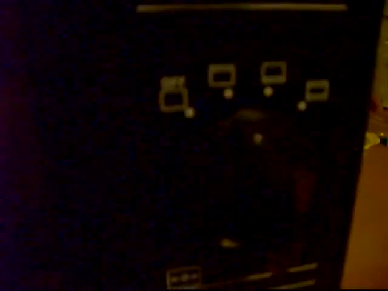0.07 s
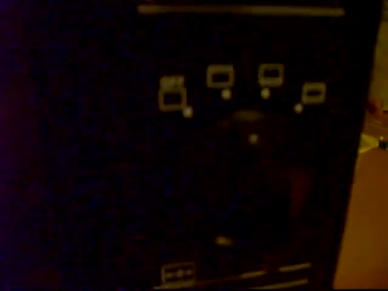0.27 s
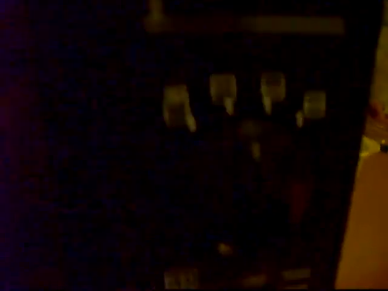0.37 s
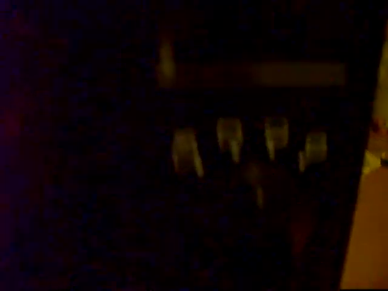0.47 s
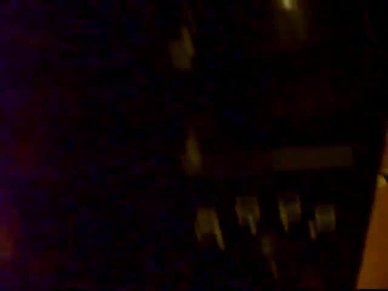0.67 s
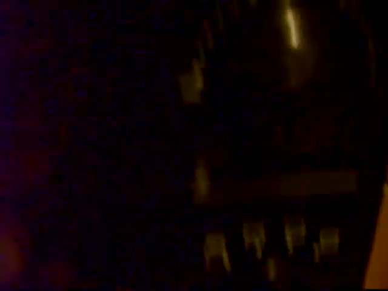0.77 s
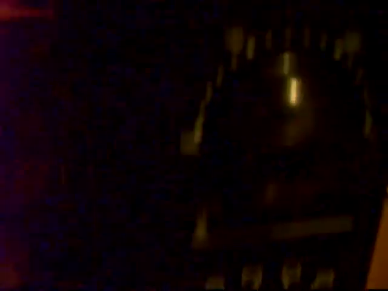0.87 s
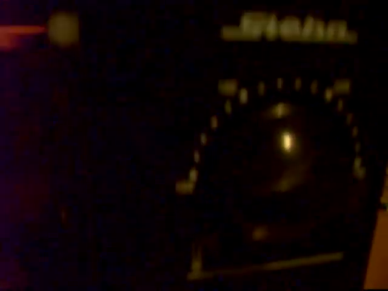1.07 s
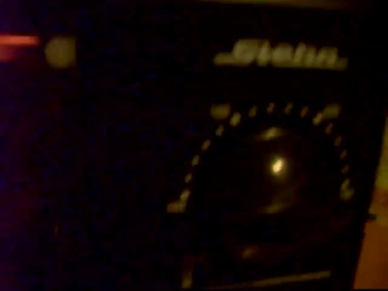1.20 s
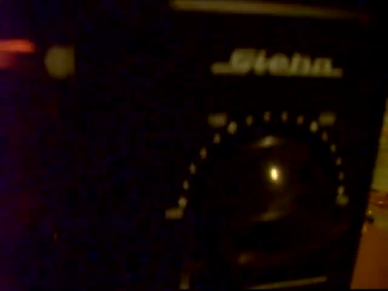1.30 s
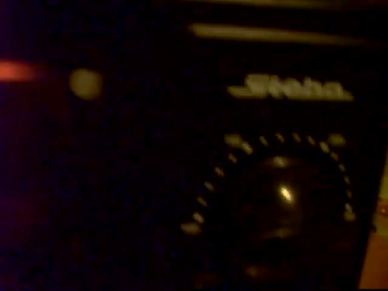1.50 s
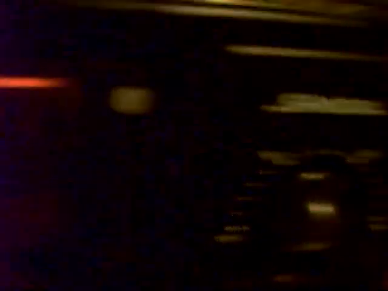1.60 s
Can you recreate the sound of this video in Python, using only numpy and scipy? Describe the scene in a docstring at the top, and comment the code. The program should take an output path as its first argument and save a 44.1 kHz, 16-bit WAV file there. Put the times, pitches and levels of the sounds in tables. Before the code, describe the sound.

A sharp plastic click sounds once, close to the microphone. A clockwork oven timer ticks faintly and evenly throughout, over the oven's low hum and hiss in a small kitchen, with a soft bump near the end.

```python
"""Small kitchen, one microphone. From the start, the oven's hum and airy rush, and hiss with a thin whine.
A clockwork oven timer ticks throughout, each beat a light catch and then a firmer drop.
At 0.2 s, close to the microphone, a plastic part creaks under strain and snaps once.
Around 1 s a brief rustle passes; at 1.3 s something bumps softly on a casing."""
import sys
import numpy as np
from scipy import signal
from scipy.fft import rfft, irfft
from scipy.io import wavfile

SR = 44100
rng = np.random.default_rng(int(sys.argv[2]) if len(sys.argv) > 2 else 0)


def generate_wav(signal):
    """Clip the signal to [-1, 1] and save it as 16-bit WAV at the path in sys.argv[1]."""
    frames = np.transpose(np.atleast_2d(signal))
    scaled = np.clip(frames, -1, 1) * 32767
    pcm = np.round(scaled).astype(np.int16)
    wavfile.write(sys.argv[1], SR, pcm)


N = 72765
TIME = np.arange(N) / SR


# the timer's light catches (time [s], level [dB])
CATCHES = [(0.174, -36), (0.4438, -39), (0.7095, -36.5), (0.976, -39.5), (1.2452, -39.5), (1.5124, -43.5)]
# its firm drops (time [s], level [dB], rebound relative to the drop [dB])
DROPS = [(0.2153, -34, -21), (0.4715, -30, -11), (.7460, -31, -2.5), (1.0070, -35.5, -6),
         (1.2846, -33.5, -10), (1.5433, -38, -2)]
def timer(slips=4, slip_db=-10.5, rebound_s=0.0061):
    """The escapement catches, slides along the tooth in tiny slips, then drops and rebounds."""
    out = np.zeros(N)
    for (catch_s, catch_db), (drop_s, drop_db, rebound_db) in zip(CATCHES, DROPS):
        add(out, catch_s, amp(catch_db) * tick(firm=False))
        for slip_s in rng.uniform(catch_s, drop_s, slips):
            add(out, slip_s, amp(catch_db + slip_db) * tick(firm=False))
        add(out, drop_s, amp(drop_db) * tick(firm=True))
        add(out, drop_s + rebound_s, amp(drop_db + rebound_db) * tick(firm=True))
    return out


# modes of the works (frequency [Hz], level at a catch [dB], level at a drop [dB], t60 [s])
WORKS_MODES = [(2390, -14.5, -12, 0.024), (2693, -7.5, -11, 0.028), (3610, -26, -9.5, 0.039),
               (3840, -25.5, -4, 0.021), (4235, -3.5, -3, 0.023), (4640, -6.5, -7.5, 0.022),
               (5000, -17, -26, 0.018), (6310, -16, -10, 0.021), (7250, -12, -11, 0.016)]
# chatter of the works (frequency [Hz], gain [dB])
CHATTER_SPECTRUM = [(800, -20), (1700, -11), (2500, -2.5), (3100, -13.5), (4000, 0.5), (4700, -1),
                    (5400, -6), (6600, -10.5), (7600, -6.5), (9000, -17)]
def tick(firm, rise_s=0.00013):
    """A small metal impact rings the works, with brief chatter and a faint tail."""
    t = TIME[:8192]
    ring = sum(amp(drop_db if firm else catch_db) * decay(t, t60) * tone(hz, t)
               for hz, catch_db, drop_db, t60 in WORKS_MODES)
    chatter = amp(3.5) * burst(t, t60=0.011)
    tail = amp(-8) * burst(t, t60=0.15)
    return colour(chatter + tail, CHATTER_SPECTRUM) + ring * attack(t, rise_s) / 2


# small cracks, the main snap, then its reflection (time [s], level [dB], dulled above [Hz])
SNAP_ARRIVALS = [(.1848, -41, 12000), (0.1904, -35, 9040), (0.1975, -26, 12100), (0.2059, -3, 8500),
                 (.207215, -10.5, 5000)]
# modes of the plastic part (frequency [Hz], level [dB], t60 [s])
PLASTIC_MODES = [(144, -38, 0.097), (608, -15, 0.046), (760, -1.5, 0.012), (881, -19.5, 0.03),
                 (1100, -13, 0.038), (1400, -4.5, 0.007), (1772, -4, 0.011), (2025, -4, 0.009),
                 (2590, -12, 0.019), (3333, -5, 0.011), (5040, -16, 0.0047), (6140, -1, 0.0032),
                 (7160, -29, 0.0078), (3630, -28, 0.0187)]
def snap():
    """Small cracks and the main snap ring the plastic; a nearby surface adds a quick, duller reflection."""
    t, out = TIME[:4096], np.zeros(N)
    ring = modes(PLASTIC_MODES, t) * attack(t, rise_s=0.000036)
    for start_s, db, dull_hz in SNAP_ARRIVALS:
        crack = amp(-36) * burst(t, t60=0.005)
        rattle = amp(-25.5) * burst(t, t60=0.045)
        lowpass = signal.butter(1, dull_hz, fs=SR)
        add(out, start_s, amp(db) * signal.lfilter(*lowpass, (ring + crack + rattle) / 2))
    return out


# course of the creak, close by (time [s], level [dB])
CREAK_LEVEL = [(.182, -58), (.195, -47), (.199, -32), (.204, -38), (.208, -48)]
# its colour (frequency [Hz], relative density [dB])
CREAK_SPECTRUM = [(300, -1.5), (800, -4.5), (1400, -3.5), (2100, 11), (3000, -13), (4100, 5.5), (5300, -20),
                  (6600, 2), (8300, -19)]
def creak(slip_db=5.5):
    """Tiny uneven slips in the strained plastic build up to the snap."""
    level_db = np.interp(TIME, *np.transpose(CREAK_LEVEL), left=-np.inf, right=-np.inf)
    return noise(CREAK_SPECTRUM) * amp(level_db + slip_db * drift(hz=700))


# soft knock and its rebound (time [s], level [dB])
KNOCKS = [(1.3394, -29), (1.3428, -41)]
# modes of the casing (frequency [Hz], level [dB], t60 [s])
CASING_MODES = [(45, -16, 0.11), (115, -22, 0.02), (640, -8, 0.037), (913, -0.5, 0.019),
                (1120, -10.5, 0.017), (3500, -12, .008)]
def knock():
    """A soft bump rings a casing."""
    t, out = TIME[:8192], np.zeros(N)
    ring = modes(CASING_MODES, t) * attack(t, rise_s=0.00027)
    for start_s, db in KNOCKS:
        add(out, start_s, amp(db) * ring)
    return out


# colour of the rustle (frequency [Hz], relative density [dB])
RUSTLE_SPECTRUM = [(500, -18), (1500, -0.5), (2500, 2.5), (4000, 1), (5500, -5), (7000, 1), (9000, -12)]
def rustle(peak_s=1.011, width_s=0.07, level_db=-53.5, grain_db=2):
    """A soft grainy rustle swells and fades."""
    swell = np.exp(-((TIME - peak_s) / width_s) ** 2 / 2)
    return noise(RUSTLE_SPECTRUM) * swell * amp(level_db + grain_db * drift(hz=200))


# the oven's air (frequency [Hz], relative density [dB])
RUSH_SPECTRUM = [(20, 0.5), (45, -0.5), (80, -4.5), (140, -5), (250, -4.5), (370, -3.5), (480, -5.5),
                 (680, -1), (780, -4.5), (880, -0.5), (1120, -3), (1350, -12), (2200, -17.5), (4000, -41.5)]
# its course (time [s], level [dB])
RUSH_LEVEL = [(0, -51.5), (.7, -54), (.95, -50), (1.3, -50.5), (1.65, -51)]
# mains and motor hum (frequency [Hz], start level [dB], end level [dB])
HUM_TONES = [(100, -57.5, -60), (110.3, -69, -55.5), (111.5, -73.5, -54.5), (361, -74.5, -74.5)]
def oven(waver_rad=0.47, flutter_db=0.86):
    """Under the ticking, air rushes and the motor hums, both a little louder toward the end."""
    rush_db = np.interp(TIME, *np.transpose(RUSH_LEVEL))
    rush = noise(RUSH_SPECTRUM) * amp(rush_db + flutter_db * drift(hz=25))
    hum = sum(amp(np.linspace(start_db, end_db, N)) * tone(hz, TIME, waver_rad * drift(hz=4.3))
              for hz, start_db, end_db in HUM_TONES)
    return rush + np.sqrt(2) * hum


# background hiss (frequency [Hz], relative density [dB])
HISS_SPECTRUM = [(100, 1.5), (1500, 2), (2600, 6), (4000, 2), (5500, 2.5), (7600, 0), (8300, -4.5),
                 (9000, -11)]
# thin whine (frequency [Hz], level [dB])
WHINE_TONES = [(7790, -72), (7830, -83), (7860, -70), (7892, -70.5), (8107, -75), (8140, -72.5),
               (8210, -79)]
def hiss(hiss_db=-59.5, waver_rad=0.45):
    """Behind everything, even hiss with a cluster of high, wavering tones."""
    whine = sum(amp(db) * tone(hz, TIME, waver_rad * drift(hz=12)) for hz, db in WHINE_TONES)
    return amp(hiss_db) * noise(HISS_SPECTRUM) + np.sqrt(2) * whine


def amp(db):
    """Decibels to gain."""
    return 10 ** (np.asarray(db) / 20)


def add(mix, start_s, sound):
    """Mixes a sound in at its start time."""
    part = mix[round(start_s * SR):][:len(sound)]
    part += sound[:len(part)]


def attack(t, rise_s):
    """Smooth rise from 0 to 1."""
    return 1 - np.exp(-t / rise_s)


def decay(t, t60):
    """Falls 60 dB in t60 seconds."""
    return np.exp(-np.log(1000) * t / t60)


def tone(hz, t, shift_rad=0):
    """Sine with a random starting phase."""
    return np.sin(2 * np.pi * (hz * t + rng.random()) + shift_rad)


def modes(table, t):
    """Dying tones of a struck object."""
    return sum(amp(db) * decay(t, t60) * np.cos(2 * np.pi * hz * t) for hz, db, t60 in table)


def burst(t, t60):
    """Dense dying chatter of random sign."""
    return rng.choice([-1., 1.], len(t)) * decay(t, t60)


def gain_at(spectrum, hz):
    """Gain of a spectrum, read on a log-frequency axis."""
    points_hz, db = np.transpose(spectrum)
    return amp(np.interp(np.log(hz + 1), np.log(points_hz), db))


def shaped_noise(gains):
    """Noise weighted per frequency bin, at rms 1."""
    x = irfft(rfft(rng.standard_normal(N)) * gains, N)
    return x / np.sqrt(np.mean(x ** 2) + 1e-20)


def noise(spectrum):
    """Steady noise with the given spectrum."""
    return shaped_noise(gain_at(spectrum, np.fft.rfftfreq(N, 1 / SR)))


def drift(hz):
    """Random wander up to about the given rate."""
    bins_hz = np.fft.rfftfreq(N, 1 / SR)
    return shaped_noise((bins_hz > 0) * np.exp(-(bins_hz / hz) ** 2))


def colour(x, spectrum, size=2048):
    """Minimum-phase filter with the given spectrum."""
    log_gain = np.log(gain_at(spectrum, abs(np.fft.fftfreq(size, 1 / SR))))
    response = np.exp(np.conj(signal.hilbert(log_gain)))
    taps = np.fft.ifft(response).real[:size // 2]
    return signal.oaconvolve(x, taps)[:len(x)]


def scene():
    """The kitchen at one microphone."""
    return (timer() + snap() + creak() + knock() + rustle() + oven() + hiss())[None]


def record(dry):
    """The recorder's narrow band cuts the top treble."""
    edge_hz = 8470
    taps = signal.firwin(131, edge_hz, window=("kaiser", 8), fs=SR)
    return signal.oaconvolve(dry, taps[None], "same")


dry = scene()
out = record(dry)
generate_wav(out)
```